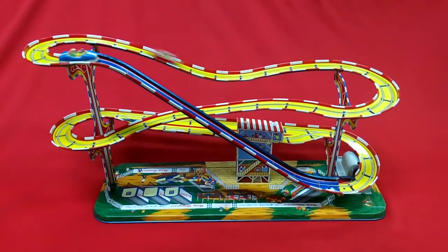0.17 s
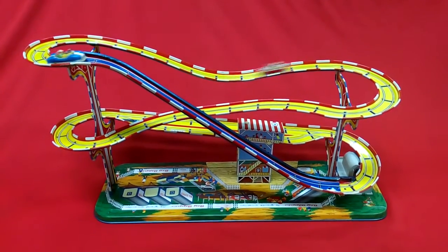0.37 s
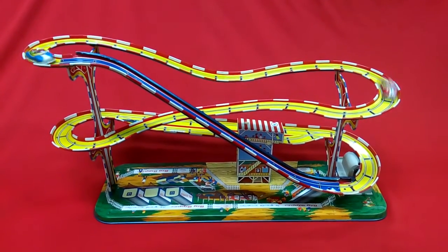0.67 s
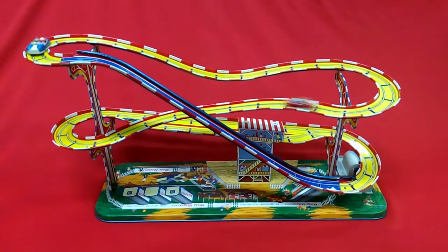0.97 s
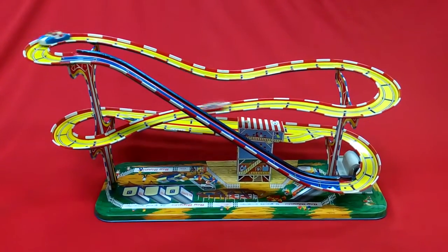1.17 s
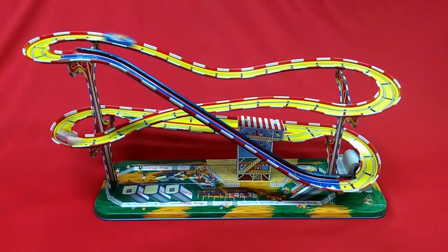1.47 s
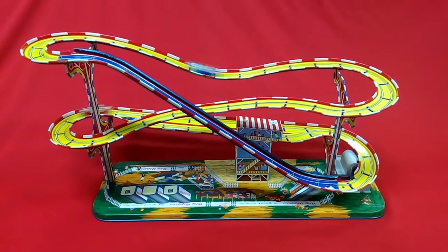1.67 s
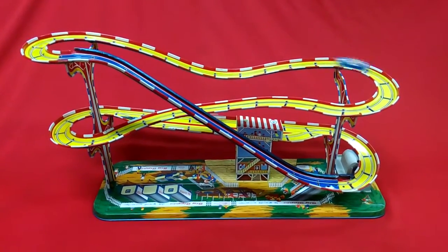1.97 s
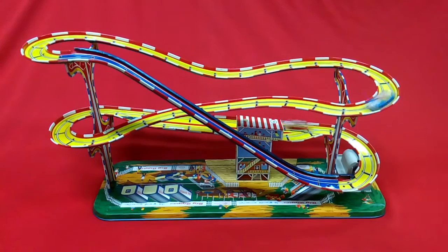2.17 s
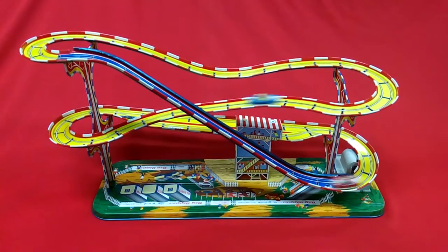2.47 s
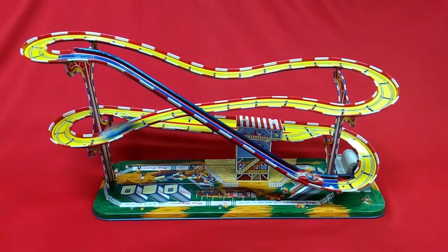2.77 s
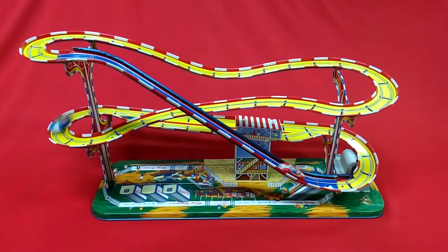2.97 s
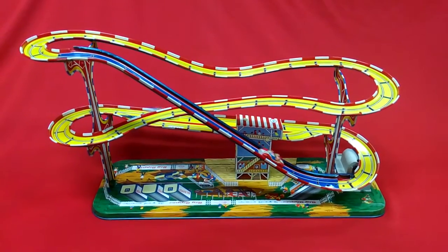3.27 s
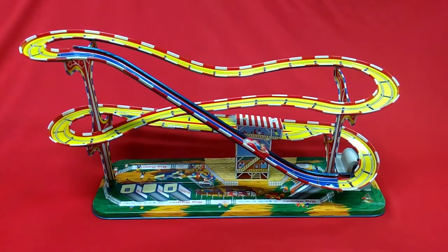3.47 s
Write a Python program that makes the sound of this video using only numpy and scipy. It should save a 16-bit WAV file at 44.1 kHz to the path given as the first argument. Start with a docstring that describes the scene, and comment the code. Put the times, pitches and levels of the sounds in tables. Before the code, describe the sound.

A battery-driven tin toy rattles steadily in a small room, its fast gears bright and metallic over a thin motor whine. Small cars roll along the track and scrape in the bends, and the motor slows slightly near the end.

```python
"""The gears of a battery-driven tin toy rattle in a small room. Their teeth strike one another, harder once
in every turn, and the thin sheet metal rings. The motor whines, and it slows when a car boards the lift.
Small cars tick along the tin track and scrape the rail in the bends. Underneath, the shaken base rumbles,
bumps and hums on the table."""
import sys
import numpy as np
from scipy import signal
from scipy.fft import rfft, irfft, next_fast_len
from scipy.io import wavfile

SR = 44100
rng = np.random.default_rng(int(sys.argv[2]) if len(sys.argv) > 2 else 0)


def persist_wave(psi):
    """Save psi, clipped to +-1, as 16-bit WAV."""
    counts = np.round(np.clip(psi, -1, 1) * 32767).astype(np.int16)
    wavfile.write(sys.argv[1], SR, np.atleast_2d(counts).T)


N = 159201
TIME = np.arange(N) / SR


def from_db(db):
    """Turn decibels into a number to multiply a sound by."""
    return 10 ** (np.asarray(db) / 20)


def rms_one(x):
    """Scale a signal so that its average size (rms) is 1."""
    return x / np.sqrt(np.mean(x ** 2) + 1e-20)


def in_time(rows):
    """Join (time, value) points with straight lines, giving one value per sample."""
    return np.interp(TIME, *np.transpose(rows))


def drift(rate_hz):
    """A smooth random wander of average size 1, mostly slower than rate_hz."""
    step, warm_up = 40, 2000  # one point per 40 samples; the first points are dropped
    pole = np.exp(-2 * np.pi * rate_hz * step / SR)
    noise = rng.standard_normal(N // step + warm_up + 2)
    slow = signal.lfilter([1], [1, -2 * pole, pole * pole], noise)[warm_up:]
    return np.interp(np.arange(N) / step, np.arange(len(slow)), rms_one(slow))


def colour(x, points):
    """Make some pitches louder and others softer, along a curve of (f/Hz, gain/dB) points."""
    hz, db = np.transpose(points)
    size = next_fast_len(N + SR // 2)
    bin_hz = np.maximum(np.arange(size // 2 + 1) * SR / size, 1)
    gain = from_db(np.interp(np.log(bin_hz), np.log(hz), db))
    return irfft(rfft(x, size) * gain, size)[:N]


def bursts(times, db, decay_s):
    """A loudness curve that jumps at each hit and dies away; overlapping hits add in power."""
    kicks = np.zeros(N)
    np.add.at(kicks, np.clip(times * SR, 0, N - 1).astype(int), from_db(db) ** 2)
    power = signal.lfilter([1], [1, -np.exp(-2 / (decay_s * SR))], kicks + 1e-18)
    return np.sqrt(power)


def tones(rows, clock, flutter_db, flutter_hz):
    """Pure tones that each flutter in level; when their clock runs slower, they all drop in pitch."""
    total = np.zeros(N)
    for hz, db in rows:
        flutter = from_db(flutter_db * drift(flutter_hz))
        wave = np.sin(2 * np.pi * (hz * clock + rng.random()))
        total += from_db(db) * rms_one(flutter * wave)
    return total


def tin(x):
    """Sheet metal passes a vibration on and adds its own ringing notes."""
    # the notes the tin rings at: f/Hz, width/Hz, gain/dB
    modes = [(1230, 70, 6), (1780, 45, 3), (2110, 50, 8), (2175, 45, 3), (2340, 45, 7), (3335, 75, 3.2),
             (4390, 60, -1.5), (4630, 83, -4.8), (5013, 42, -1.5), (5203, 60, .9), (5974, 29, 3.9),
             (6206, 60, -6.5), (6780, 76, .3), (7000, 80, -8), (7190, 100, -.3), (7520, 59, .5),
             (7760, 50, -3.5), (8069, 74, -6), (9540, 200, -3.2), (10215, 107, -3.1), (10989, 63, -3.6),
             (12713, 122, -5.9)]
    out = x.copy()
    for hz, width_hz, db in modes:
        pole = np.exp(-np.pi * width_hz / SR)
        feed_in = np.array([1, 0, -1]) * (1 - pole * pole) / 2
        feedback = [1, -2 * pole * np.cos(2 * np.pi * hz / SR), pole * pole]
        out += from_db(db) * signal.lfilter(feed_in, feedback, x)
    return out


def room(x, fade_s=.19, first_echo_s=.004):
    """Nearby walls send back a blur of echoes that fades by 60 dB in fade_s."""
    t = TIME[:SR // 2]
    tail = rng.standard_normal(len(t)) * from_db(-60 * t / fade_s) * (t > first_echo_s)
    return signal.fftconvolve(x, tail / np.sqrt(np.sum(tail ** 2)))[:N]


def base(rumble_db=-45.5, throb_db=2.5):
    """The shaken base rumbles unevenly, bumps and hums on the table."""
    # how the rumble rises and falls: t/s, relative level/dB
    rumble_levels = [(0, -2), (.5, -1.5), (1.2, 1), (1.65, -2), (1.9, 2.5), (2.2, -1.5), (2.6, 1),
                     (2.95, 1.5), (3.25, -5), (3.61, -1.5)]
    # low bumps of the frame: t/s, relative level/dB
    bumps = [(0.033, -36), (0.972, -35), (1.169, -35), (1.37, -44), (1.647, -38), (1.789, -32),
             (2.138, -37), (2.316, -45), (3.192, -34)]
    # tone colour of the base on the table: f/Hz, gain/dB
    rumble_colour = [(20, -30), (35, -21), (48, -6), (78, -13), (98, 2), (130, -2.5), (185, -5.5),
                     (280, -15), (400, -25.5), (530, -15), (720, -39.5), (1100, -30), (2500, -53)]
    # low hum of the base: f/Hz, level/dB
    hum_tones = [(64.5, -52.5), (101.5, -58)]
    shake = from_db(rumble_db + in_time(rumble_levels) + throb_db * drift(rate_hz=6))
    bump_times, bump_db = np.transpose(bumps)
    shake = np.hypot(shake, bursts(bump_times, bump_db - 7, decay_s=.05))
    rumble = shake * rms_one(colour(rng.standard_normal(N), rumble_colour))
    return rumble + tones(hum_tones, TIME, flutter_db=5.5, flutter_hz=6.9)


def wheel_ticks(per_s=9000, spread_db=1):
    """Small wheels make thousands of tiny, uneven taps that merge into a hiss."""
    taps = (rng.random(N) < per_s / SR) * rng.choice([-1, 1], N)
    return taps * from_db(spread_db * rng.standard_normal(N))


def cars(rolling_db=-28):
    """The cars roll over the tin track and scrape the rail in the bends."""
    # how loudly the cars roll: t/s, relative level/dB
    rolling_levels = [(0, -2.5), (.3, -2.5), (.6, -4.5), (.8, -3), (1.05, -2), (1.35, -4), (1.65, -2.5),
                      (1.95, 0.5), (2.17, -0.5), (2.55, 1), (2.8, -1), (3.03, -1), (3.12, -3.5),
                      (3.3, -2.5), (3.4, 1.5), (3.61, -0.5)]
    # tone colour of the track: f/Hz, gain/dB
    track_colour = [(200, -21.5), (500, -12.5), (900, -12), (1400, -13), (2250, -5), (2800, -9.5),
                    (3600, -2.5), (4600, 1), (5400, 4.5), (7000, -16), (10000, -3.5), (15500, -30)]
    # scrapes along the rail: middle t/s, half length/s, level/dB
    scrapes = [(0.665, 0.034, -27), (1.512, 0.066, -24), (1.874, 0.089, -30.5), (2.077, 0.041, -26),
               (2.37, 0.049, -29), (2.623, 0.047, -26), (2.954, 0.052, -26.5)]
    # tone colour of the rail: f/Hz, gain/dB
    rail_colour = [(500, -26), (1400, -17.5), (2250, -10), (2800, -15), (3700, -5.5), (4600, 4),
                   (5400, -1.5), (7000, -10), (15500, -28)]
    track = rms_one(tin(colour(wheel_ticks(), track_colour)))
    rail = rms_one(tin(colour(wheel_ticks(), rail_colour)))
    pressure = sum(from_db(db) * np.exp(-((TIME - middle) / half) ** 2) for middle, half, db in scrapes)
    return from_db(rolling_db + in_time(rolling_levels)) * track + pressure * rail


def motor(turns, free_turns_per_s=46, wobble=.0015, gain_db=-2):
    """The motor whines at pitches that follow its slightly unsteady speed."""
    # the whine when the motor runs freely: f/Hz, relative level/dB
    whine_tones = [(586.8, -60.5), (829.0, -58), (1147, -53), (1244, -55), (1470, -53.5), (1572, -54),
                   (1787, -49), (2110, -48), (2164, -46.5), (2304, -60), (2347, -46), (2455, -46)]
    clock = turns / free_turns_per_s + wobble * np.cumsum(drift(rate_hz=7.88)) / SR
    return from_db(gain_db) * tones(whine_tones, clock, flutter_db=3, flutter_hz=25)


def gears(turns, teeth=10, jitter_turns=.03, spread_db=2, rub=.85, swell_db=1.9, rattle_db=-17.5):
    """Each tooth of a small gear strikes and chatters; it sits off centre, so it swells once a turn."""
    # moments when the gears catch harder: t/s, relative strength/dB
    catches = [(.352, -1), (.4205, 1.5), (.5285, 3.5), (.592, 3), (.7005, 0), (1.068, 2), (1.178, 2),
               (1.5685, .5), (1.985, .5), (2.8525, 2), (2.897, 3.5), (3.3365, 1), (3.3585, 3), (3.4078, 3)]
    # tone colour of the gear case: f/Hz, gain/dB
    case_colour = [(400, -52), (1000, -38.5), (1600, -33.5), (2200, -31.5), (2800, -34), (3500, -27.5),
                   (4400, -18.5), (5600, -22.5), (6400, -13.5), (7100, -8), (8000, -15.5), (8900, -19),
                   (9700, -21), (12500, -25.5), (15500, -33.5)]
    # how hard the gears rattle: t/s, relative level/dB
    effort = [(0, -1), (.3, 0), (.55, 0.6), (.9, -0.5), (1.4, 0.26), (2.0, 0.1), (2.65, .6), (2.78, -0.4),
              (2.92, 0.6), (3.2, -1), (3.4, -0.5), (3.61, -1)]
    tooth_turns = np.arange(1, int(turns[-1] * teeth)) / teeth
    timing_luck, strength_luck = rng.uniform(-1, 1, (len(tooth_turns), 2)).T
    strike_times = np.interp(tooth_turns + jitter_turns * timing_luck, turns, TIME)
    chatter = rms_one(bursts(strike_times, spread_db * strength_luck, decay_s=.0022))
    force = rms_one(np.hypot(rub, chatter))  # steady rubbing fills the gaps between strikes
    force *= from_db(swell_db * np.cos(2 * np.pi * turns))
    catch_times, catch_db = np.transpose(catches)
    force = np.hypot(force, bursts(catch_times, catch_db, decay_s=.006))
    rattle = tin(colour(force * rng.standard_normal(N), case_colour))
    return from_db(rattle_db + in_time(effort)) * rms_one(rattle)


def scene(start_turn=.063, room_db=-10):
    """The toy and its room in one channel; gears and motor share the same turning."""
    # motor speed, dropping near the end as a car boards the lift: t/s, speed/(turns per s)
    speed = [(0, 41.94), (.25, 46.245), (1.8, 46.005), (2.0, 45.964), (2.75, 45.749), (3.05, 43.323),
             (3.61, 42.562)]
    turns = start_turn + np.cumsum(in_time(speed)) / SR
    rattle = gears(turns) + cars()
    echoes = from_db(room_db) * room(rattle)
    return (rattle + echoes + motor(turns) + base())[None]


def record(dry):
    """Cut the very highest treble off steeply."""
    cutoff_hz = 15750
    return signal.sosfilt(signal.ellip(12, .1, 90, cutoff_hz, fs=SR, output="sos"), dry)


dry = scene()
out = record(dry)
persist_wave(out)
```